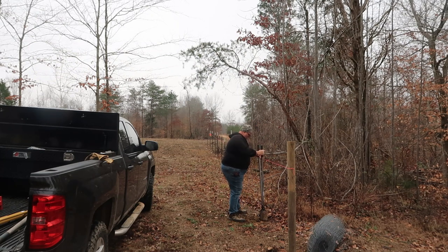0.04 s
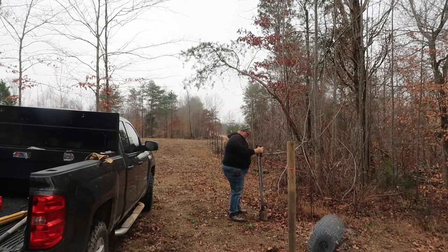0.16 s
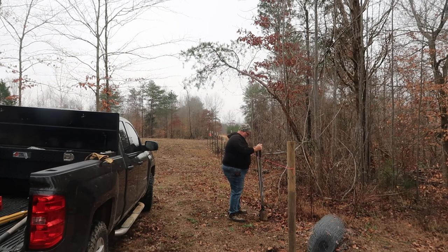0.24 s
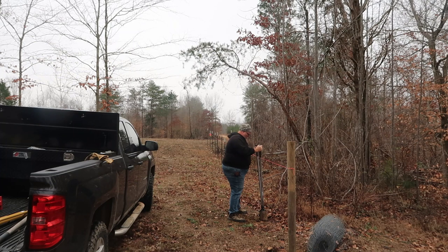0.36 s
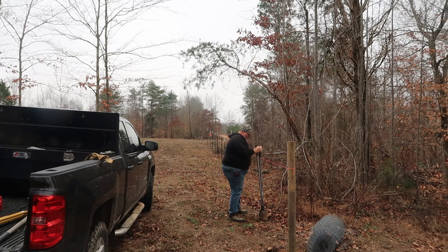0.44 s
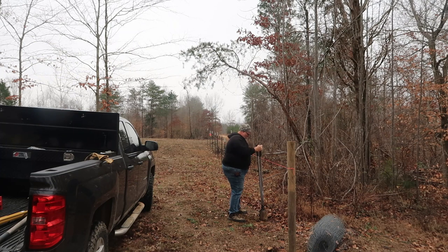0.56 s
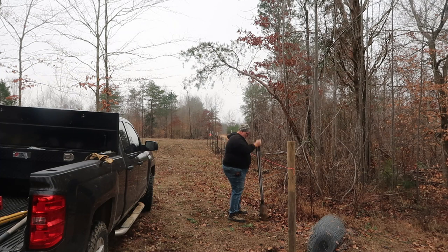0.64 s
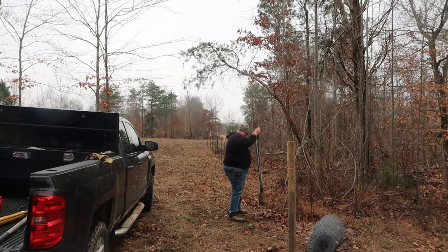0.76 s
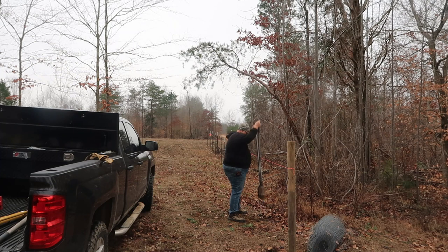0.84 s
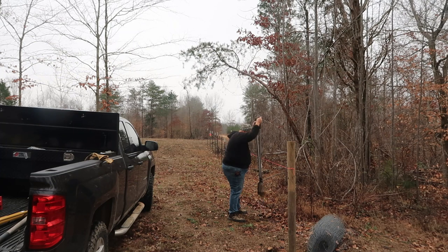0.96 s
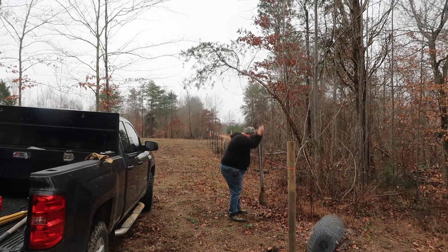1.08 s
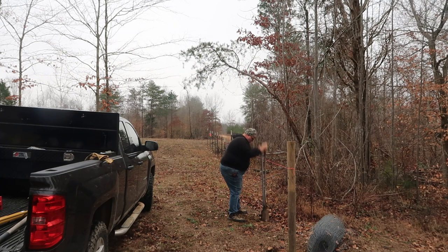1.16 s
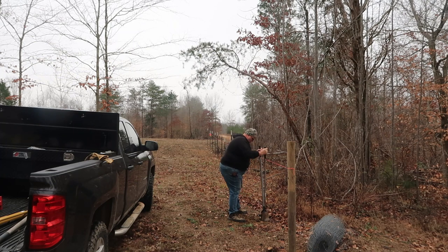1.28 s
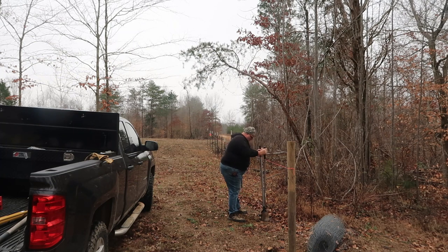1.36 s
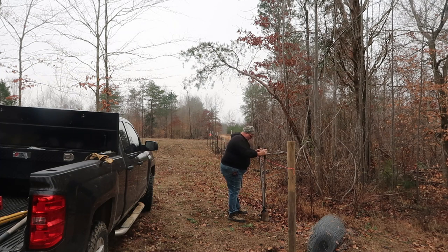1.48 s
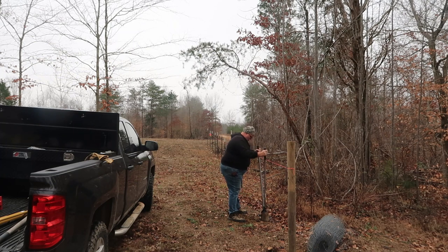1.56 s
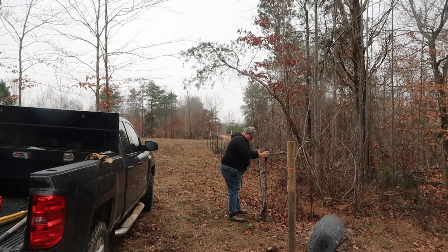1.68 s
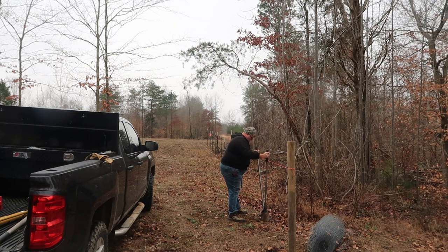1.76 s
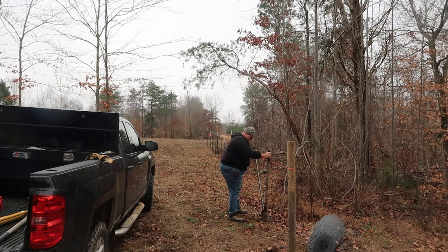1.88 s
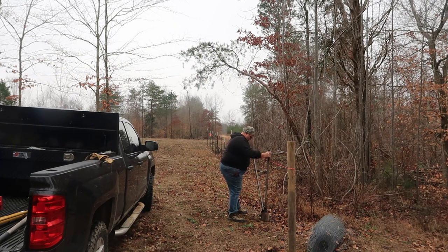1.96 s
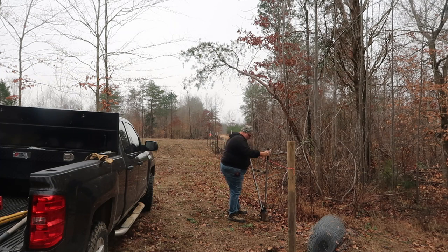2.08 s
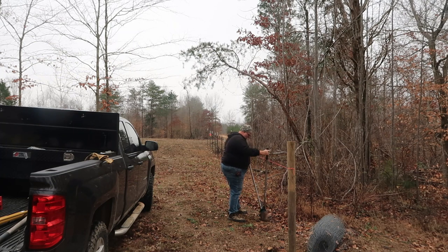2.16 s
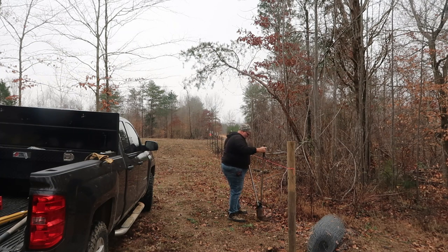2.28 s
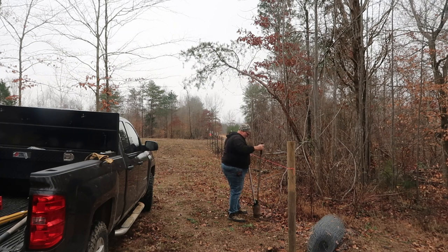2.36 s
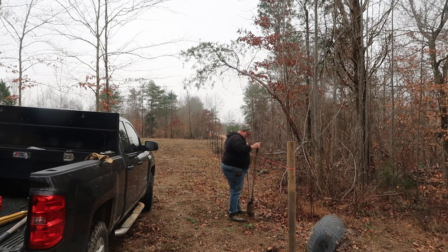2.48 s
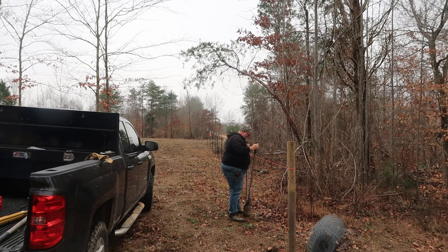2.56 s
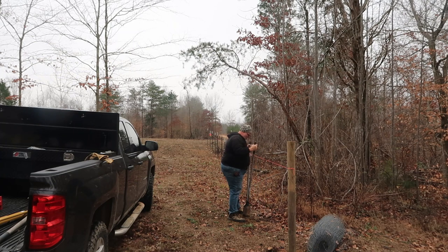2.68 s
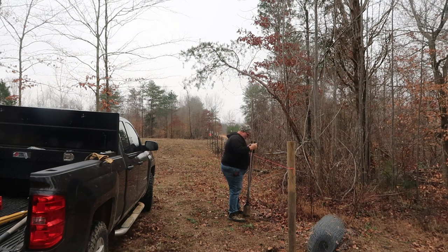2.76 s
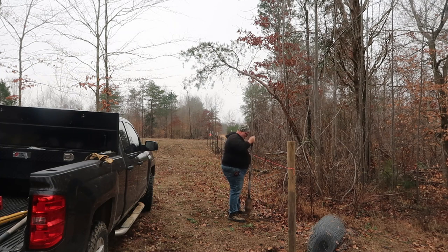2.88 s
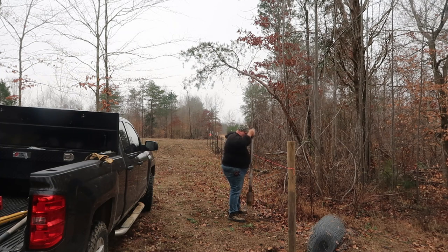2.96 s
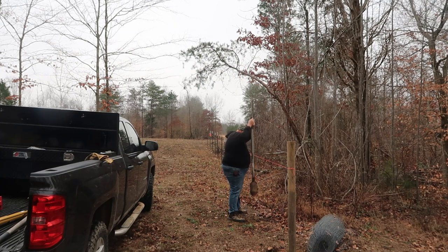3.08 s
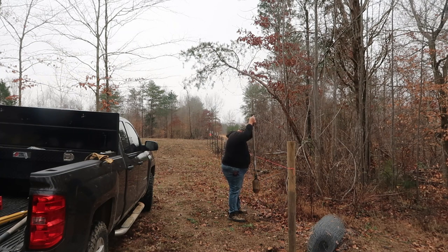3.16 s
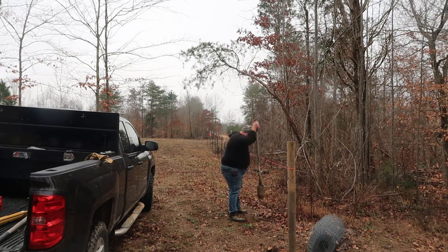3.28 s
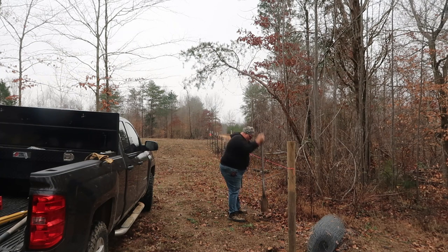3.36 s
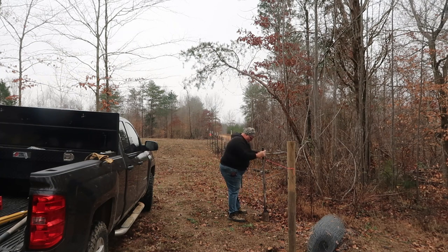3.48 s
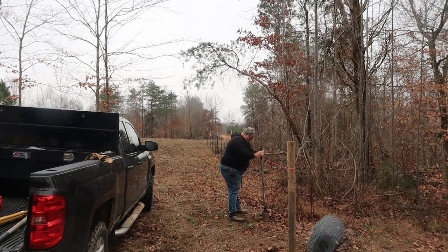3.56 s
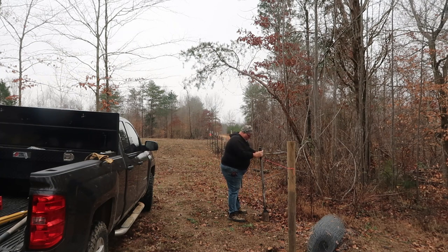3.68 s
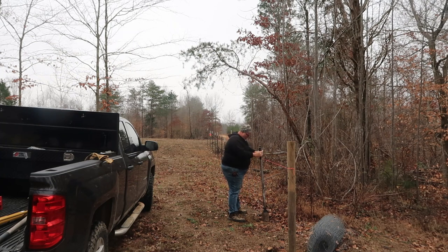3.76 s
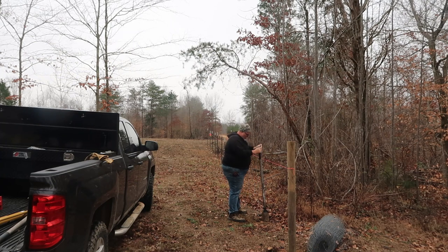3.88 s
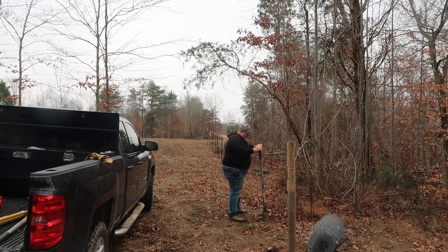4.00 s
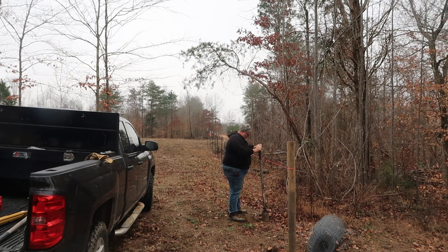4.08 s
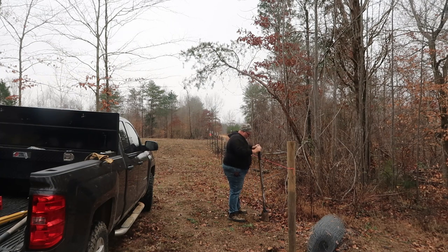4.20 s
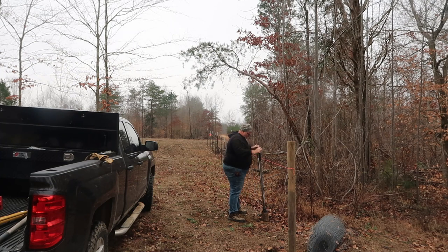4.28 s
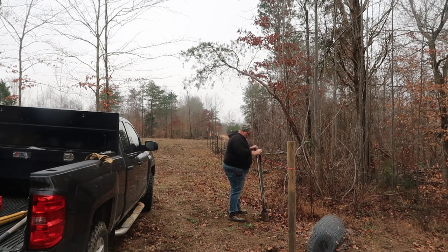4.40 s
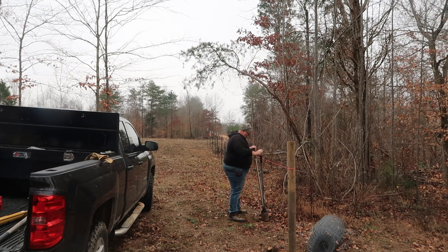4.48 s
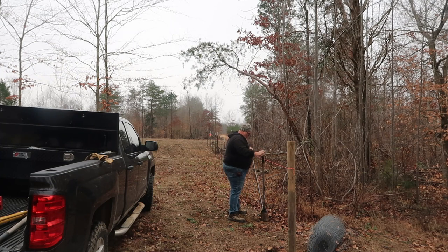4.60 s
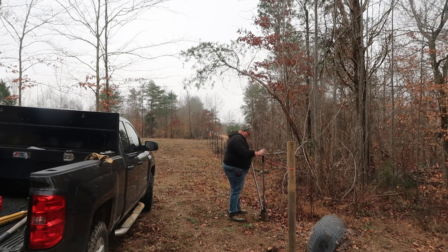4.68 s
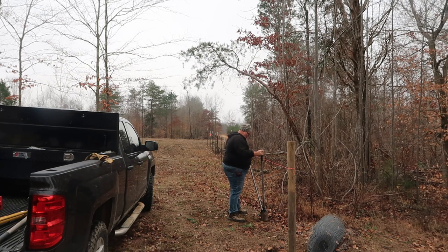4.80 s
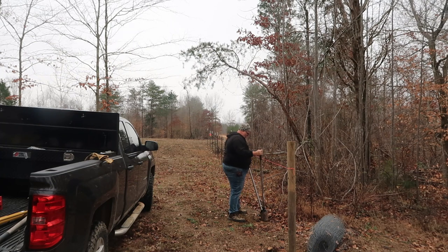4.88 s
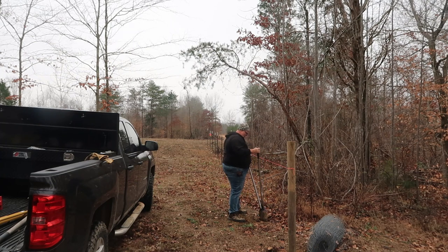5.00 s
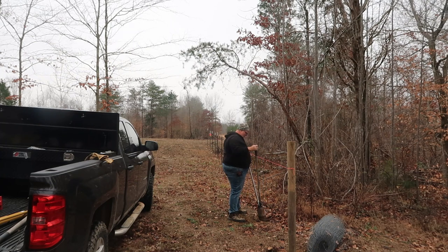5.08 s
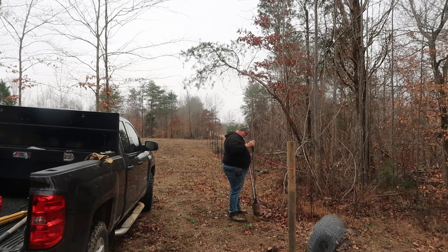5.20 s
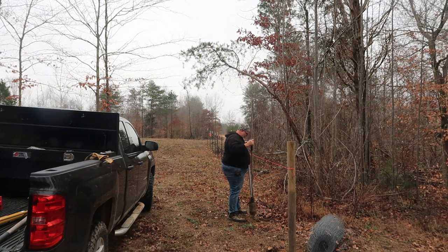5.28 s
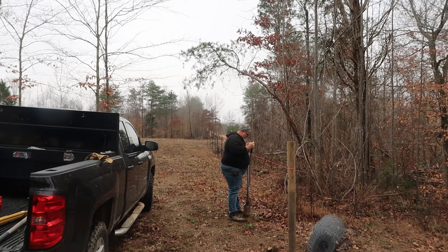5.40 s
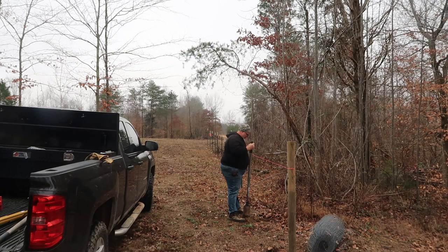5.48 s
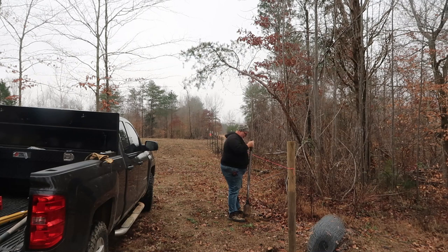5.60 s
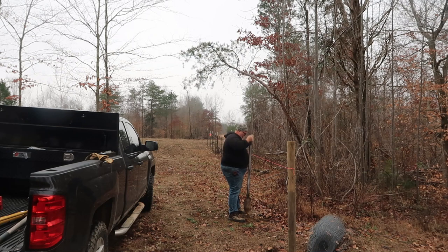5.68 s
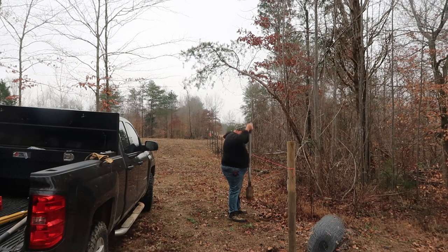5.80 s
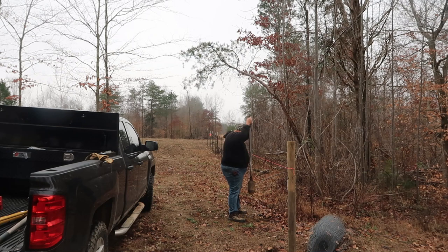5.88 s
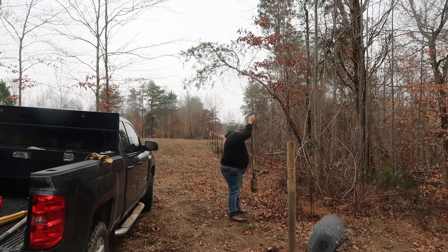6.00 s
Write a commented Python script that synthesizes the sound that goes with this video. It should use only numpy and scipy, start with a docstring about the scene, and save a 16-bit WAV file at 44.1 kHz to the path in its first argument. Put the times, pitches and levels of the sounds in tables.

```python
"""Digging in woodland soil

A two-handled steel digging tool is rammed into soil, levered and emptied, some metres from two microphones.
Bursts of noise ring the steel blades as soil crunches; small slips make the wooden handles knock and creak.
Gliding tones make faint chirps and a hum, narrow noise makes a rasp, and the ground booms softly.
Trees return a short wash of shaped noise; quiet air noise, a far rumble and a thin whine lie underneath.
Gain control turns everything down after the hardest blows, then lets it creep back."""
import sys
import numpy as np
from scipy import signal
from scipy.fft import rfft, irfft
from scipy.io import wavfile
from scipy.ndimage import uniform_filter1d

SR = 44100
rng = np.random.default_rng(int(sys.argv[2]) if len(sys.argv) > 2 else 0)


def dump(signal):
    """Clip the signal to [-1, 1] and save it as 16-bit WAV at the path in sys.argv[1]."""
    limited = np.clip(np.atleast_2d(signal).T, -1, 1)
    pcm = np.round(limited * 32767).astype(np.int16)
    wavfile.write(sys.argv[1], SR, pcm)


N = 266364  # length in samples

# All levels are those before the echo and gain control. Times below 0 start before the sound is heard.
# Soil against the blades: (t/s, level/dB, 60 dB fall time/s, handles against grit/dB, tilt/dB per octave)
DIG_EVENTS = [(-.07, -8.5, 0.11, 3, 0), (0.202, -46, 0.091, -22, -2.5), (.666, -37.5, 0.087, 0.5, 3),
              (1.3022, 0, 0.02, -6, 4), (1.3063, 0, 0.022, -7.5, 3), (1.325, -21, 0.023, 3, -7),
              (2.228, -54.5, .08, 6.5, 1), (2.692, -32.5, 0.05, -2.5, 0), (2.707, -30, 0.11, -14.5, -4),
              (2.718, -23.5, 0.052, -14, 1), (2.758, -50.5, 0.26, -23, -1.5),
              (2.901, -55.5, 0.15, -17.5, -0.5), (3.545, -18.5, 0.081, -5, 9), (3.549, -22.5, .03, -14, 4),
              (3.553, -10, 0.044, 2, 4.5), (3.79, -61, 0.044, 12.5, 2), (4.312, -40, 0.23, 2, 0.5),
              (4.359, -42.5, 0.098, -8, -4), (4.42, -38, 0.089, 3, -2), (4.474, -40.5, 0.091, 4, -1),
              (4.657, -45.5, 0.076, 15.5, -5), (4.684, -47.5, 0.048, -4, -1.5),
              (4.702, -39.5, 0.031, -1, -3.5), (5.07, -57.5, 0.13, -3.5, -1.5),
              (5.526, -45.5, 0.13, -5.5, 3), (5.547, -26, 0.096, -5, -0.5), (5.582, -46, 0.22, 0, .6)]
# Leaves and loose soil rustle louder as the tool comes down for a hard blow: (t/s, level/dB)
RUSTLE_EVENTS = [(1.12, -57), (3.37, -62)]
# The handles slip on the hinge bolt with a knock: (t/s, peak of the handles/dB, blades against handles/dB)
KNOCK_EVENTS = [(.211, -27.5, 1), (.233, -28, -12), (1.077, -40.5, -14), (1.104, -41, -15),
                (1.895, -30.5, -5), (1.92, -15.5, -17.5), (1.933, -22.5, -11.5), (1.952, -33, -11),
                (1.958, -31, -7), (1.997, -33, -14), (2.004, -32, -8), (2.012, -33.5, -6), (2.026, -37, -1),
                (2.061, -38, 2), (3.152, -49.5, 1.1), (4.219, -22.5, -10.5), (4.231, -38, 0),
                (4.279, -19, -3.5), (4.315, -23, -4), (4.335, -20.5, -1), (4.343, -21.5, -4),
                (4.357, -22.5, -15), (4.371, -29, -13), (4.455, -19.5, -5.5), (4.463, -18.5, -2),
                (4.499, -24.5, -13), (4.513, -16, -14), (4.525, -28, -14), (4.538, -23, -5),
                (4.542, -20.5, -28), (4.558, -26, -6.5), (4.576, -23.5, -15)]
# Loaded handles creak in small uneven slips: (t/s, length/s, level before the swell lowers it/dB)
CREAK_EVENTS = [(-.08, .17, -36), (.16, 0.15, -44.5), (1.956, 0.096, -39.5), (4.243, 0.138, -34),
                (4.408, 0.22, -32), (4.54, 0.17, -35)]
# A faint narrow rasp: (t/s, length/s, level before the swell lowers it/dB)
RASP_EVENTS = [(.04, 0.17, -54), (2.163, 0.13, -61.5), (2.351, 0.37, -68), (4.34, .09, -51),
               (4.52, 0.24, -55.5), (4.931, 0.26, -64), (5.527, .025, -48)]
# Faint chirps, from the hinge or a far bird:
# (t/s, length/s, first f/Hz, last f/Hz, extra f midway/Hz, level before the swell lowers it/dB)
CHIRP_EVENTS = [(.872, .058, 1330, 1520, 90, -55), (.943, .047, 1400, 1433, 0, -53),
                (1.215, .068, 1270, 1640, 30, -53), (2.3, .12, 1330, 1310, 270, -55),
                (2.57, .05, 1618, 1670, 0, -62), (2.965, .035, 1440, 1400, 0, -57)]
# A handle hums on after the blow just gone: one row with the same columns as the chirps
HANDLE_HUM = (-.04, .23, 630, 575, 0, -47)
# The ground booms just after the blades stop: (t/s, peak/dB)
THUD_EVENTS = [(-.06, -23), (1.311, -18), (2.726, -53), (3.561, -10.5), (3.794, -43), (4.33, -37),
               (5.56, -43)]

# Ringing tones, with levels relative to each other: (f/Hz, level/dB, 60 dB fall time/s)
BLADE_MODES = [(1114, -9.5, 0.027), (1217, -8.5, 0.034), (1429, -5.5, 0.03), (1685, -5, 0.013),
               (1958, -12, 0.052), (2102, -7.5, 0.025), (2460, -6, 0.019), (2527, -7.5, 0.046),
               (2916, -6, .025), (3126, -10, 0.04), (3505, -9.5, 0.031), (3830, -6.5, 0.0095),
               (4384, -16.5, 0.027), (4540, -14.5, 0.029), (5348, -23.5, 0.0053)]  # steel blades, damped by soil
HANDLE_MODES = [(243, -7, 0.04), (306, -5.5, 0.033), (462, 0.5, 0.037), (654, 3, 0.026), (824, 2, 0.016)]  # wooden handles, before the grip or a slip shifts their pitch
GROUND_MODES = [(71.3, -10, 0.37), (93.5, 2.5, 0.051), (182, -10, 0.091), (284, -15, 0.2)]  # packed earth under the blow
RASP_MODES = [(2470, 0, 0.042), (2540, -6, .02)]  # the two narrow tones in the rasp

# Colour of bare soil noise, relative: (f/Hz, level/dB)
SOIL_COLOUR = [(100, -24), (300, -4.5), (700, -7), (1500, -1.5), (3000, 3.5), (4600, -10.5), (5600, -14.5),
               (7200, -14), (10000, -29), (15800, -32.5)]
# How long the trunks keep sound alive: (f/Hz, near 60 dB fall time/s, far 60 dB fall time/s)
WOODS_FALL = [(101.07, 0.89, .9), (400, 0.19, 0.92), (1500, .3, 1), (4000, 0.28, 1), (7000, 0.55, 0.31),
              (12000, .15, .3)]
# Share the woods send back: (f/Hz, level/dB)
WOODS_RETURN = [(150, -17), (700, -14.5), (3000, -15.5), (5500, -7), (8000, -13), (12000, -21)]
# Left-right likeness of the woods: (f/Hz, likeness from -1 to 1)
WOODS_LIKENESS = [(300, 1), (1500, 0.99), (5000, .2)]
# Colour of the quiet air and far rumble, relative: (f/Hz, level/dB)
AIR_COLOUR = [(12, -56), (20, -22), (58, 1), (126, -14.5), (386, -13.5), (554, -17), (674, -17.5),
              (1430, -21.5), (1600, -20), (2430, -24), (13400, -40.5), (15800, -69.5)]
# Left-right likeness of the air: (f/Hz, likeness from -1 to 1)
AIR_LIKENESS = [(60, 1), (240, 0.1), (950, -0.012), (3770, 0.27), (15000, -0.94)]
# Left against right for the tool: (f/Hz, level/dB)
TOOL_SHADE = [(60, 1), (240, 1.5), (950, -1), (3770, 0), (15000, -2)]

LEAD = SR // 5  # samples mixed before the sound is heard
SCATTER_DB = 1.5  # spread of the ringing levels from blow to blow
RISE_SHARE = .07  # rise time of a crunch as a share of its fall time
RUSTLE_SHAPE = (.185, .05, -8.5, -1)  # rise/s, 60 dB fall time/s, handles/dB, tilt/dB per octave
AIR_LEVEL_DB, WHINE_HZ, WHINE_DB = -51, 13001, -91  # both levels are rms


def dig(level_db, rise, t60, handles_db, tilt_db):
    """Grit breaks in a burst of uneven grains that shake blades and handles."""
    t = np.arange(SR // 3) / SR
    fall = amp(-60 * np.maximum(t - rise, 0) / t60)
    shape = np.minimum(t / max(rise, 1e-4), 1) * fall
    grains_db = 1.8 * uniform_filter1d(rng.exponential(1, len(t)), size=12)
    grit = shape * rng.standard_normal(len(t)) * amp(grains_db)
    grit *= np.linalg.norm(shape) / np.linalg.norm(grit)
    # dull crunches are more soil than steel; harder contact rings more steel
    bare_db = 1 - 1.15 * tilt_db - 0.11 * (level_db + 38.5)
    steel = tilted(crunched(grit, bare_db), tilt_db)
    # harder blows clamp the handles in the grip and raise their ring
    pitch = 1 + 0.0032 * max(level_db + 28, 0)
    wood = signal.fftconvolve(grit, ring(HANDLE_MODES, pitch, SCATTER_DB))[:len(t)]
    wood *= np.linalg.norm(shape) / np.linalg.norm(wood)
    return amp(level_db) * (steel + amp(handles_db) * wood)


def crunched(grit, bare_db):
    """Grit heard through the blades and straight off the soil, each part scaled by the grit's energy."""
    bare = coloured(grit, lambda hz: read(SOIL_COLOUR, hz))
    steel = signal.fftconvolve(grit, ring(BLADE_MODES, scatter_db=SCATTER_DB))[:len(grit)]
    both = steel / np.linalg.norm(steel) + amp(bare_db) * bare / np.linalg.norm(bare)
    return both * np.linalg.norm(grit)


def knock(peak_db, blades_db):
    """One slip: a short jolt rings the handles, a scratch of a few milliseconds rings the blades."""
    pitch = 1 + .05 * rng.uniform(-0.93, 1)  # the ring varies from slip to slip
    wood = ring(HANDLE_MODES, pitch, SCATTER_DB, rise=0.00068)
    t = np.arange(len(wood)) / SR
    scratch = rng.standard_normal(len(t)) * amp(-60 * t / 0.026)
    steel = tilted(crunched(scratch, bare_db=-7.5), -2)  # the scratch is dull
    return amp(peak_db) * (wood / abs(wood).max() + amp(blades_db) * steel / abs(steel).max())


def creak(length, level_db, slips_per_s=400, blades_db=-12):
    """A stream of small slips of uneven size and spacing rings handles and blades."""
    t, gain = arch(length, level_db, swell_db=-12)
    slips = (rng.random(len(t)) < slips_per_s / SR) * rng.standard_normal(len(t))
    body = ring(HANDLE_MODES, rise=0.00073) + amp(blades_db) * ring(BLADE_MODES)
    return evened(signal.fftconvolve(slips, body)[:len(t)]) * gain


def rasp(length, level_db):
    """Noise in a narrow pair of resonances."""
    t, gain = arch(length, level_db, swell_db=-1.5)
    noise = rng.standard_normal(len(t))
    return evened(signal.fftconvolve(noise, ring(RASP_MODES))[:len(t)]) * gain


def chirp_or_hum(length, first_hz, last_hz, bow_hz, level_db):
    """A thin, slightly unsteady tone glides from first to last pitch, with an optional upward bow midway."""
    t, gain = arch(length, level_db, swell_db=-7)
    waver = 1 + .15 * uniform_filter1d(rng.standard_normal(len(t)), size=150)
    glide = first_hz + (last_hz - first_hz) * t / length
    hz = glide + bow_hz * np.sin(np.pi * t / length)
    return np.sqrt(2) * np.sin(2 * np.pi * np.cumsum(hz * waver) / SR) * gain


def thud(peak_db):
    """A soft push of a few milliseconds rings the earth."""
    push = np.hanning(round(0.0035 * SR))
    boom = signal.fftconvolve(push, ring(GROUND_MODES, rise=0.0033))
    fade_out = signal.windows.tukey(2 * len(boom), .3)[len(boom):]
    return amp(peak_db) * boom / abs(boom).max() * fade_out


def ring(modes, factor=1, scatter_db=0, rise=0.00032):
    """A struck body rings as a sum of fading tones of alternating sign, with energy 1; scatter varies levels."""
    t = np.arange(SR // 4) / SR
    share = amp(scatter_db * rng.standard_normal(len(modes))) * (-1) ** np.arange(len(modes))
    out = np.zeros(len(t))
    for g, (hz, db, t60) in zip(share, modes):
        out += g * amp(db - 60 * t / t60) * np.sin(2 * np.pi * hz * factor * t)
    out *= 1 - np.exp(-t / rise)
    return out / np.linalg.norm(out)


def woods(x, build=0.0034, far_db=-9, grain_db=3.0):
    """Countless trunks return a smeared wash: the power of each band lingers, the fine pattern is new noise."""
    hz, t, z = signal.stft(x, SR, nperseg=512, noverlap=384)
    power = uniform_filter1d(abs(z) ** 2, size=9, axis=0).clip(0)
    # the wash starts two frames late and builds up over a few milliseconds
    lag = np.exp(-t[1] / build)
    power = signal.lfilter([0, 0, 1], [1, -lag], power) * (1 - lag)
    # -120 because amp() is used here on power; column 1 is near, column 2 far
    fall_times = [read([(row[0], row[k]) for row in WOODS_FALL], hz) for k in (1, 2)]
    keep = amp([-120 * t[1] / t60 for t60 in fall_times])
    held = np.zeros((2, *power.shape))
    for k in range(1, len(t)):
        held[..., k] = keep * held[..., k - 1] + (1 - keep) * power[:, k]
    # single thick trunks stand out as brief wide-band lumps
    lumps = rng.standard_normal((len(t), len(hz)))
    lumps = evened(uniform_filter1d(lumps, size=40, axis=1)).T
    size = np.sqrt(held[0] + amp(2 * far_db) * held[1])
    size *= amp(read(WOODS_RETURN, hz)[:, None] + grain_db * lumps)
    wash = pair(power.shape, hz, WOODS_LIKENESS) * size
    return signal.istft(wash, nperseg=512, noverlap=384)[1][:, :len(x)]


def air():
    """Soft outdoor noise with drifting patches, and a faint steady electronic whine."""
    frames, hz = N // 512 + 5, np.fft.rfftfreq(2048, 1 / SR)
    patches = rng.standard_normal((frames, len(hz))).T
    patches = uniform_filter1d(patches, size=20, axis=0)  # across frequency
    patches = evened(uniform_filter1d(patches, size=8, axis=1))  # across time
    z = pair(patches.shape, hz, AIR_LIKENESS) * amp(read(AIR_COLOUR, hz)[:, None] + 0.37 * patches)
    noise = signal.istft(z, nperseg=2048, noverlap=1536)[1][:, :N]
    whine = amp(WHINE_DB) * np.sqrt(2) * np.sin(2 * np.pi * WHINE_HZ * np.arange(N) / SR)
    return amp(AIR_LEVEL_DB) * evened(noise) + whine


def pair(shape, hz, likeness):
    """Random short-time spectra for two microphones, alike by the given table."""
    a, b, c, d = rng.standard_normal((shape[1], shape[0], 4)).T
    same = np.clip(read(likeness, hz), -1, 1)[:, None]
    left = a + 1j * b
    right = same * left + np.sqrt(1 - same ** 2) * (c + 1j * d)
    return np.array([left, right])


def arch(length, level_db, swell_db):
    """Time axis and a gain that swells midway and sinks again; swell_db is start and end against the middle."""
    t = np.arange(0, length, 1 / SR)
    # the middle lies half of swell_db under level_db; the window also fades both ends to silence
    curve_db = level_db + swell_db * (1.5 - np.sin(np.pi * t / length))
    return t, amp(curve_db) * signal.windows.tukey(len(t), .2)


def tilted(x, db_per_octave):
    """Tilts the tone brighter or duller around 2600 Hz, flattening out in the bass."""
    return coloured(x, lambda hz: db_per_octave * np.log2((hz + 200) / 2800))


def coloured(x, gain_db):
    """Filters x by a gain in dB given as a function of frequency."""
    hz = np.fft.rfftfreq(2 * len(x), 1 / SR)
    return irfft(rfft(x, 2 * len(x)) * amp(gain_db(hz)))[:len(x)]


def read(points, hz):
    """Reads a table between its points on a log-frequency axis."""
    f, value = np.transpose(points)
    return np.interp(np.log(hz + 1), np.log(f + 1), value)


def amp(db):
    """Decibels to gain."""
    return 10 ** (np.asarray(db) / 20)


def evened(x):
    """Scales to rms 1."""
    return x / np.sqrt(np.mean(x ** 2) + 1e-20)


def add(mix, s, sound):
    """Mixes a sound in at time s; the mix starts LEAD samples early."""
    part = mix[LEAD + round(s * SR):][:len(sound)]
    part += sound[:len(part)]


def scene():
    """The tool stands a little right of centre: the left hears it one sample later and differently coloured."""
    tool, earth = np.zeros((2, N + LEAD))
    for s, level_db, t60, handles_db, tilt_db in DIG_EVENTS:
        add(tool, s, dig(level_db, RISE_SHARE * t60, t60, handles_db, tilt_db))
    for s, level_db in RUSTLE_EVENTS:
        add(tool, s, dig(level_db, *RUSTLE_SHAPE))
    tones = [*CHIRP_EVENTS, HANDLE_HUM]
    sources = ((knock, KNOCK_EVENTS), (creak, CREAK_EVENTS), (chirp_or_hum, tones), (rasp, RASP_EVENTS))
    for source, rows in sources:
        for s, *row in rows:
            add(tool, s, source(*row))
    for s, peak_db in THUD_EVENTS:
        add(earth, s, thud(peak_db))
    left = np.roll(coloured(tool, lambda hz: read(TOOL_SHADE, hz)), shift=1)
    direct = np.array([left, tool])
    return (direct + woods(tool) + earth)[:, LEAD:] + air()


def record(dry, start_db=6.5, knee_db=-11, recover_db=5.5):
    """Gain control falls after loud blows (one has just passed) and creeps back; overload clips; band limit."""
    power = uniform_filter1d((dry ** 2).mean(0), size=400)
    power_db = 10 * np.log10(abs(power) + 1e-12)
    back = np.arange(N) * recover_db / SR  # recovery in dB, recover_db each second
    wanted_db = np.maximum(1.07 * (power_db - knee_db), start_db * (back == 0))
    over_db = np.maximum.accumulate(wanted_db + back) - back
    lag = np.exp(-1 / (0.07 * SR))  # the gain follows with a lag of 0.07 s
    cut_db = signal.lfilter([1 - lag], [1, -lag], np.maximum(over_db, 0), zi=[start_db * lag])[0]
    # the microphone drops deep bass
    trimmed = signal.sosfilt(signal.butter(2, 45, "high", fs=SR, output="sos"), dry)
    clipped = np.clip(trimmed / amp(cut_db), -.97, .97)
    low_pass = signal.firwin(511, 15800, window=("kaiser", 9), fs=SR)
    return signal.oaconvolve(clipped, low_pass[None], "same")


dry = scene()
out = record(dry)
dump(out)
```